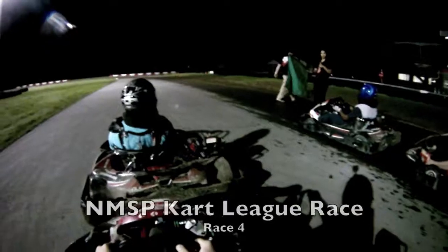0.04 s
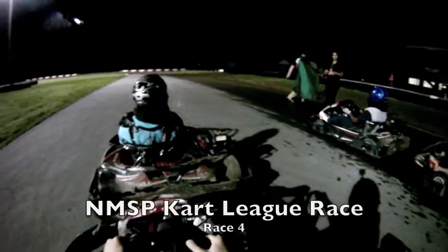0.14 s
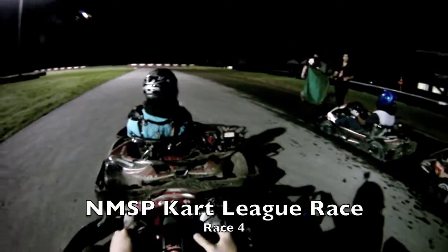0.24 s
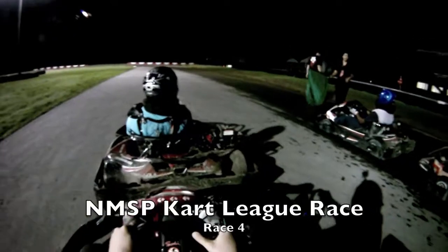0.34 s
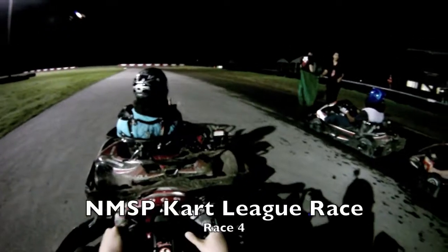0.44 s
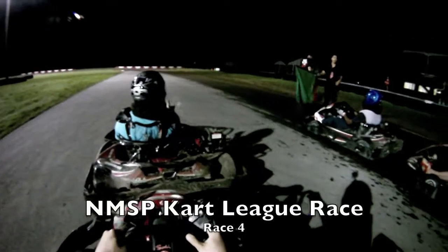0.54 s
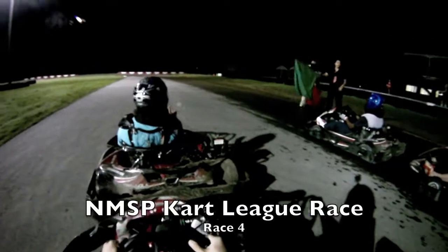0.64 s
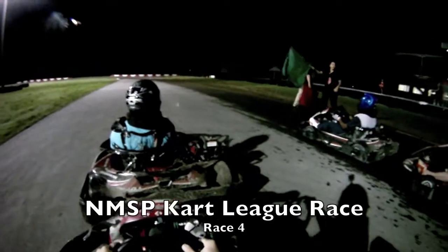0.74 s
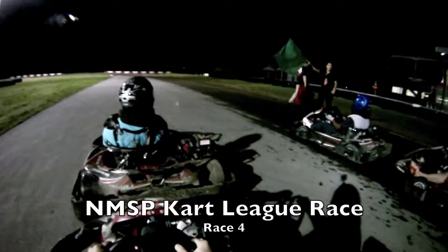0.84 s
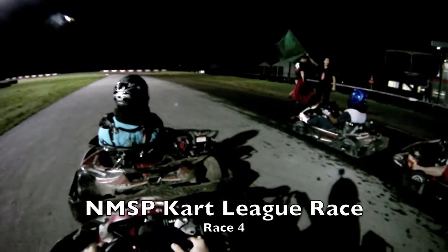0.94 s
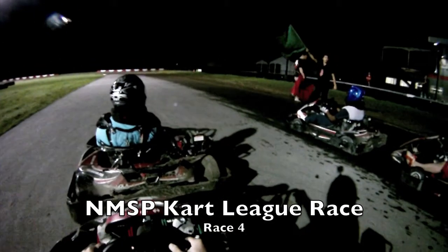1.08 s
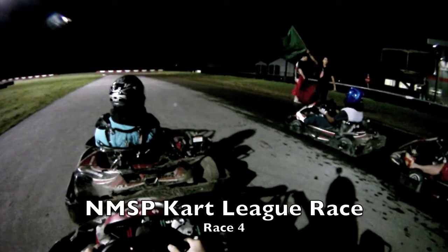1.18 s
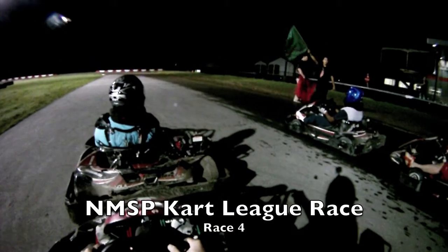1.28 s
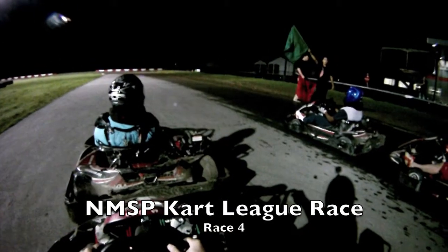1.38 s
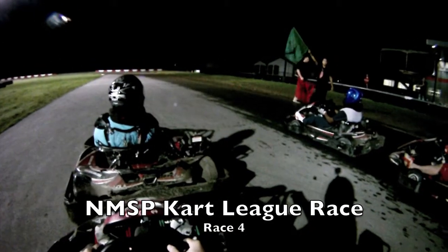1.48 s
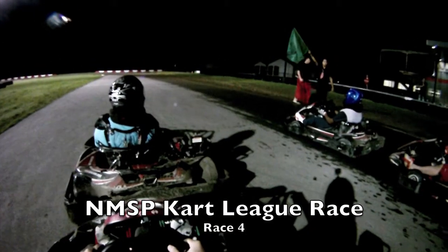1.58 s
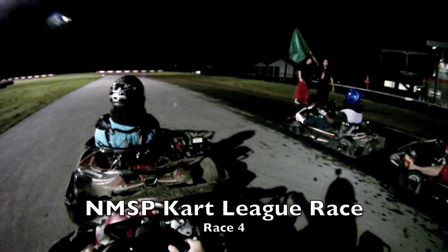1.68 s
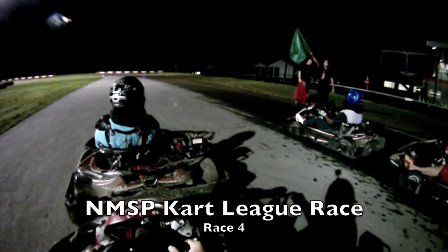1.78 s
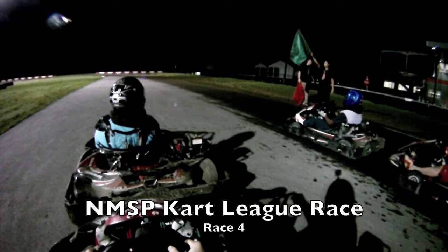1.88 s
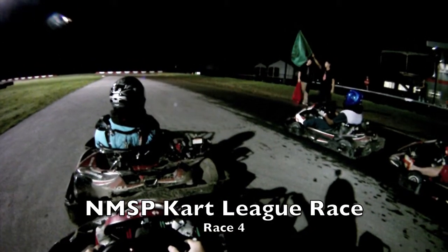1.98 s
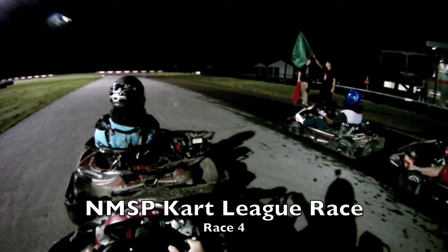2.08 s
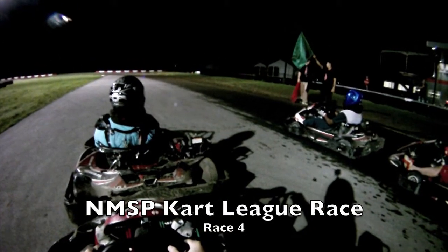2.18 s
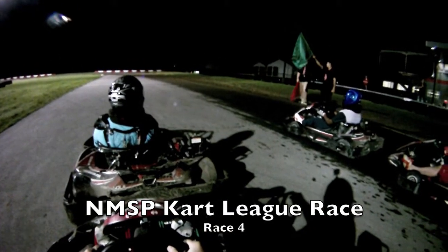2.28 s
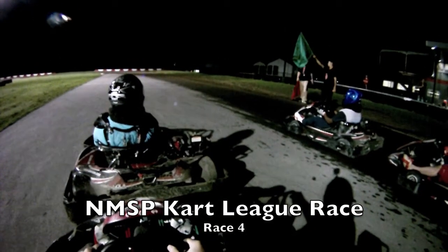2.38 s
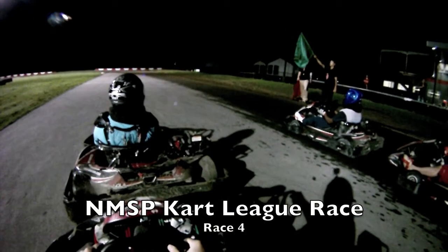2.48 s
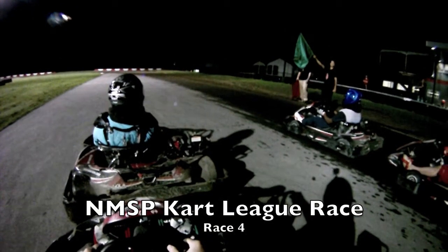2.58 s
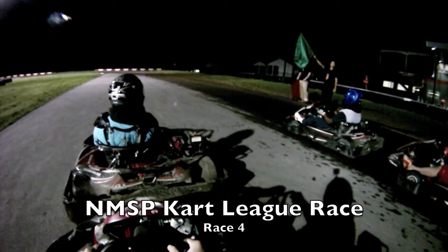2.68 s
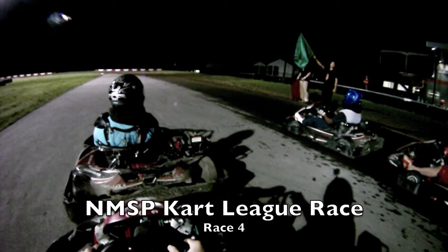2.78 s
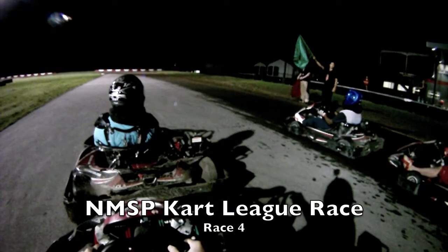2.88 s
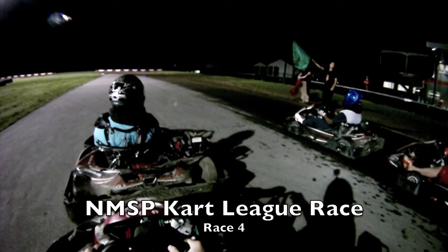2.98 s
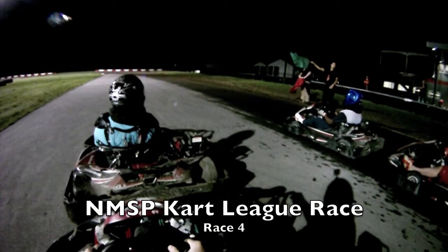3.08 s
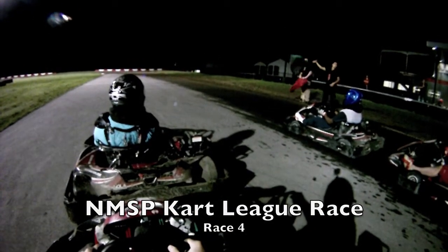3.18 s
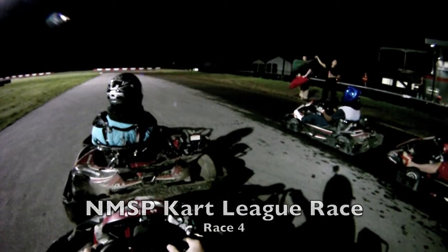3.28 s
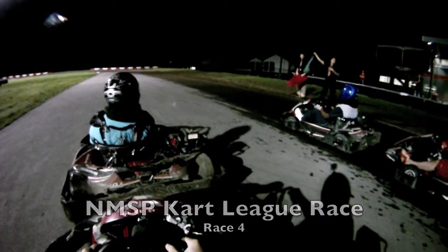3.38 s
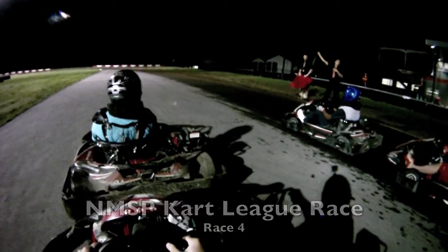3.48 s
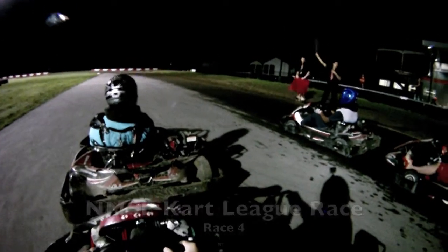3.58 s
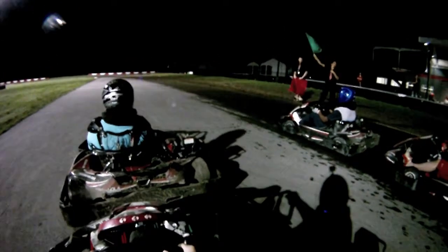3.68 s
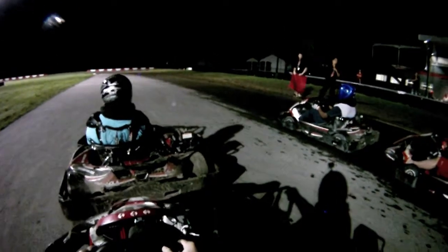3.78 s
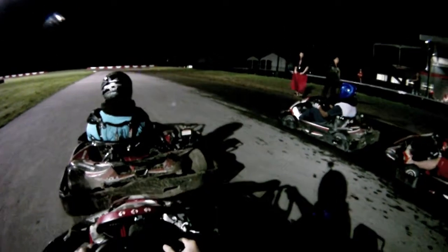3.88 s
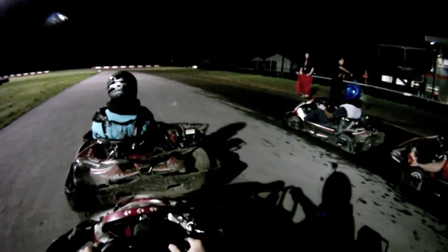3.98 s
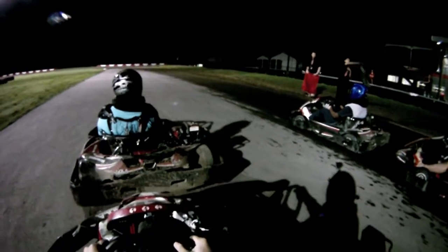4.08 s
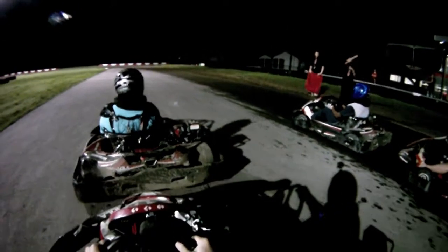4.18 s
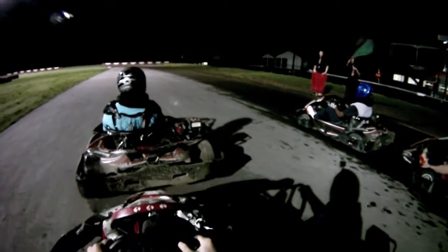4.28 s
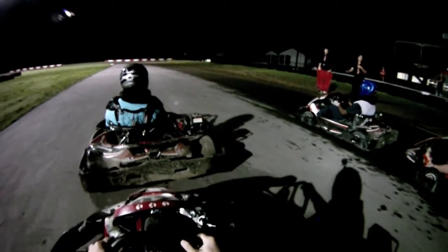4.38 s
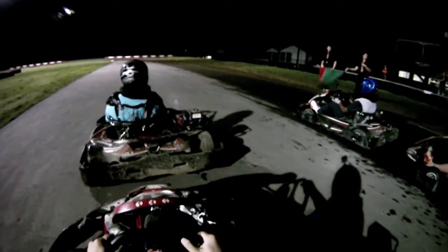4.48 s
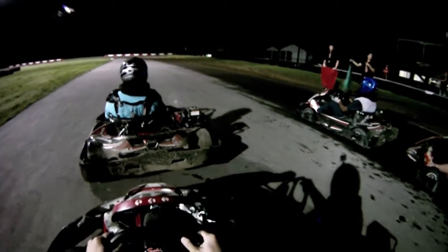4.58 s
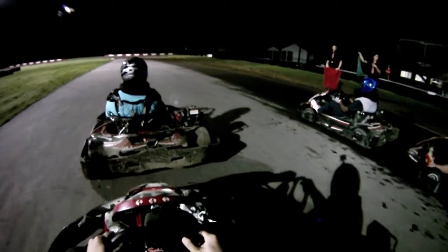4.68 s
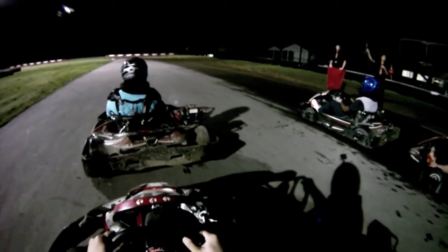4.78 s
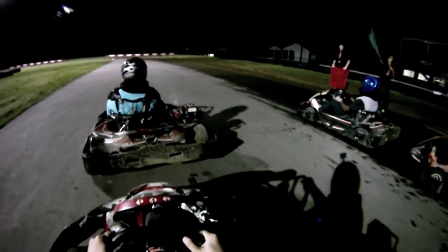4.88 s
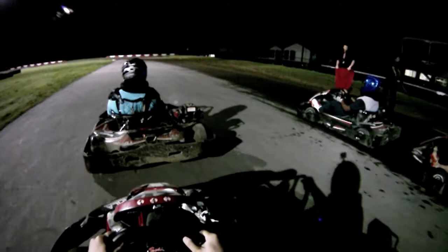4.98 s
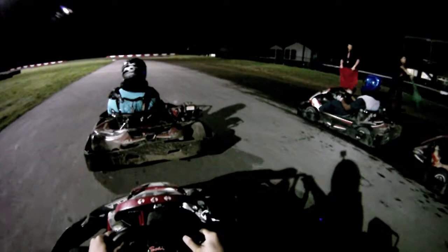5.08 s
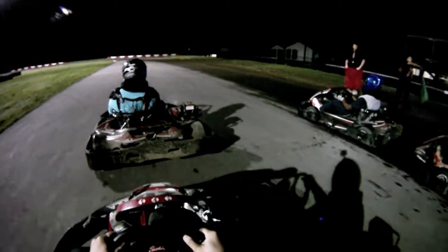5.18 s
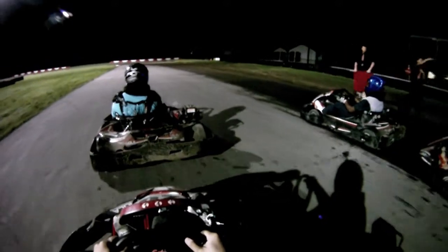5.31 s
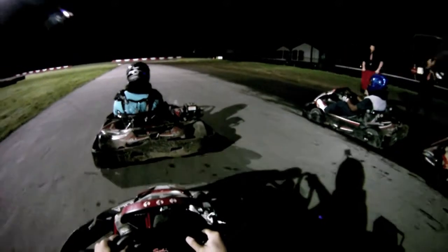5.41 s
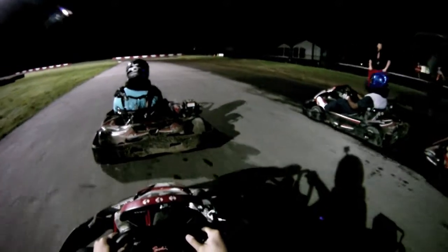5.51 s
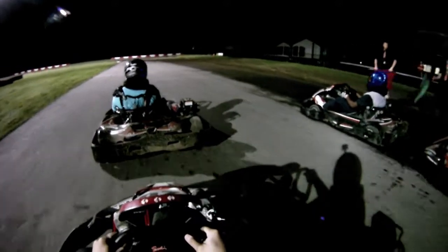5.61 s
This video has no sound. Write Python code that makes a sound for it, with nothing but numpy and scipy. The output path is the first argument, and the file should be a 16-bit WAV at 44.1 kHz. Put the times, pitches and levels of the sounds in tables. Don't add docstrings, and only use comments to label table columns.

```python
import sys
import numpy as np
from scipy import signal
from scipy.fft import rfft, irfft
from scipy.io import wavfile
from scipy.ndimage import uniform_filter1d

SR = 44100
rng = np.random.default_rng(int(sys.argv[2]) if len(sys.argv) > 2 else 0)


def magnitude_from_level(level_db):
    exponent = np.asarray(level_db, float) / 20
    return 10 ** exponent


def wrap_up_sound(samples):
    columns = np.atleast_2d(samples).T
    tamed = np.clip(columns, -1, 1)
    steps = np.round(tamed * 32767).astype(np.int16)
    wavfile.write(sys.argv[1], SR, steps)


N = 249165
T = np.arange(N) / SR

# (time [s], firing rate [1/s])
OWN_SPEED = [(0, 8.77), (1.8, 9.02), (2.4, 9.19), (2.9, 9.61), (3.3, 9.56), (3.45, 11.5), (3.7, 14.1),
             (3.8, 16.5), (3.9, 18.28), (4.0, 20.62), (4.2, 24.52), (4.35, 25.43), (4.5, 26.06),
             (4.7, 26.83), (4.9, 27.2), (5.15, 27.56), (5.65, 27.88)]
# (time [s], firing rate [1/s])
RIVAL_SPEED = [(3.36, 15.75), (3.5, 19.92), (3.7, 23.61), (3.9, 25.4), (4.2, 27.01), (4.6, 27.46),
               (5.0, 27.78), (5.65, 27.33)]
# (time [s], firing rate [1/s], level [dB])
FAR_BLIP = [
    (.1, 16, -80),
    (.3, 19.5, -60),
    (.45, 22.5, -58),
    (.6, 25.3, -56),
    (.8, 26.6, -55),
    (1.1, 27.2, -57),
    (1.35, 27, -75),
]
# (time [s], level [dB])
SHAKE = [(3.3, -33.5), (3.42, -18), (3.52, -24.5), (3.63, -11.5), (3.712, -13), (3.844, -35), (3.9, -15.5),
         (4.03, -13.5), (4.854, -18.5)]
# (time [s], level [dB])
RIVAL_THROTTLE = [(3.36, -38), (3.45, -34.5), (3.7, -33.5), (3.93, -31), (4.08, -37.5), (4.25, -32),
                  (4.55, -29.5), (4.85, -30), (5.65, -31)]
# (centre [Hz], width [Hz], gain [dB])
HOUSING = [(760, 19, 8), (1115, 293, 10.5), (1402, 45, -18), (1544, 73, 7), (2151, 273, 10.5),
           (2364, 256, 7), (2573, 217, 13), (3177, 43, 3.5), (3635, 440, 7), (4250, 810, -2.5),
           (5140, 350, 2)]
# (frequency [Hz], density [dB per Hz])
RATTLE = [(200, 2), (500, -7.5), (1000, -2), (2000, -1.5), (3000, -3.5), (4500, -5.5), (5500, -13),
          (6000, -19)]
# (frequency [Hz], density [dB per Hz])
BARK = [(200, -20.5), (500, -0.5), (1100, -1.5), (2000, -4), (3000, -6.5), (4500, -8), (5500, -11),
        (6000, -31)]
# (frequency [Hz], density [dB per Hz])
RUMBLE = [(30, -41), (70, 3), (130, 0.5), (250, -2.5), (400, -11), (700, -11), (1000, -39.5)]
# (frequency [Hz], gain [dB])
PIPE = [(70, -16), (110, -11), (165, -5), (200, -9), (245, -9), (278, 0), (305, -3), (335, -5), (360, 0),
        (395, -13), (450, -9), (540, -11), (700, -17)]
# (frequency [Hz], gain [dB])
FAR_PIPE = [(100, -14), (200, -6), (260, -8), (295, 0), (325, -5), (350, -9), (375, -5), (430, -20)]
# (time [s], peak level [dB], pitch [Hz], t60 [s])
KNOCKS = [
    (1.123, -40, 560, 0.036),
    (1.186, -40, 564, 0.049),
    (1.244, -36, 540, 0.021),
    (1.299, -42, 560, 0.031),
    (1.295, -35, 165, 0.041),
    (5.593, -20, 225, 0.16),
    (5.63, -24, 175, 0.12),
]
# (time [s], tick rate [1/s], level [dB])
CHATTER = [
    (1.15, 34, -75),
    (1.24, 49, -53),
    (1.5, 34, -58),
    (1.6, 86, -82),
]

OWN_FIRES_S, RIVAL_FIRES_S, CRANK_TOP_S = 3.19, 3.360, 5.0495
LOST_AT_S, LOST_S = 5.065, 1024 / 44100
IDLE_PER_S, FULL_PER_S = 9.0, 28.0

IDLE_SHAKE_DB, SHAKE_DB_PER_FIRING, IDLE_LOPE_DB, SETTLE_DB_PER_S = -43.5, 9.5, 0.5, 4.2
JOLT_S, JOLT_WIDTH_S, JOLT_DB = 0.51, 0.16, 6
MOUNT_HZ, MOUNT_WIDTH_HZ = 42, 16
LOCK_FROM_PER_S, LOCK_IN_PER_S, LOCK_SHARE, LOCK_HZ, RING_TOP_S = 9.6, 1.6, 0.94, 41, 3.655
CRANK_LEADS_PER_S, HANDOVER_PER_S, IDLE_SHARE, FULL_SHARE = 15.5, 1.8, 0.12, 0.985

IDLE_RATTLE_DB, IDLE_RUMBLE_DB, FAR_RATTLE_DB, FAR_RUMBLE_DB = -47, -53.5, -1, -2.5
RATTLE_DB, RATTLE_DB_PER_FIRING = 0.5, 0.4
RUMBLE_DB, SMOOTH_FROM_PER_S, SMOOTH_DB_PER_FIRING = -4.5, 24.3, 3
RING_DB, RING_DB_PER_FIRING, RING_FULL_PER_S = -3, 0.5, 22.3
CRACK_DB, CRACK_HZ, CRACK_WIDTH_HZ, CRACK_DULLS_DB_PER_FIRING = -10, 3530, 300, 0.85

PULLS_AWAY_S, AWAY_DB_PER_S = 4.62, 9
SILENCER_HZ, SILENCER_WIDTH_HZ = 1100, 95
RIVAL_DRONE_DB, DRONE_FOLLOWS, ROAR_DB, ROAR_FOLLOWS = -41.5, 1, -41, 0.86
OWN_DRONE_DB, OWN_DRONE_RISE_DB = -60.5, 24.5


def in_time(rows):
    s, *columns = np.transpose(rows)
    return [np.interp(T, s, column) for column in columns]


def on_log_hz(hz, rows):
    table = np.array(rows)
    return np.interp(np.log(hz), np.log(table[:, 0]), table[:, 1])


def power_sum(*dbs):
    return 10 * np.log10(sum(magnitude_from_level(db) ** 2 for db in dbs))


def rms_one(x, window_s=None):
    power = uniform_filter1d(x ** 2, int(window_s * SR)) if window_s else np.mean(x ** 2)
    return x / np.sqrt(power + 1e-12)


def shaped(x, spectrum, peaks=()):
    size = 2 ** 18
    hz = np.arange(size // 2 + 1) * SR / size + 1e-3
    db = on_log_hz(hz, spectrum)
    for mid_hz, width_hz, top_db in peaks:
        db = db + top_db * np.exp(-(2 * (hz - mid_hz) / width_hz) ** 2 / 2)
    cepstrum = irfft(np.log(magnitude_from_level(db)))
    cepstrum[1:size // 2] *= 2
    cepstrum[size // 2 + 1:] = 0
    return irfft(rfft(x, size) * np.exp(rfft(cepstrum)))[:N]


def resonance(x, hz, width_hz):
    r = np.exp(-np.pi * width_hz / SR)
    zeros = np.array([1, 0, -1]) * (1 - r * r) / 2
    poles = [1, -2 * r * np.cos(2 * np.pi * hz / SR), r * r]
    return signal.lfilter(zeros, poles, x + 1e-18)


def drift(rate_hz):
    knots = rng.standard_normal(400)
    return np.interp(T * rate_hz, np.arange(400), knots)


def cycles(per_s, zero_s):
    count = np.cumsum(per_s) / SR + per_s * LOST_S * (T > LOST_AT_S)
    return count - count[int(zero_s * SR)]


def firings(count, uneven_db, jitter_cycles):
    clicks = np.zeros(N)
    at = np.flatnonzero(np.diff(np.floor(count + jitter_cycles * drift(25))) > 0)
    clicks[at] = magnitude_from_level(uneven_db * rng.standard_normal(600)[:len(at)])
    return clicks


def puff(clicks, decay_s):
    return signal.lfilter([1], [1, -np.exp(-1 / (decay_s * SR))], clicks + 1e-18)


def orders(per_s, count, pipe, wobble_db, heard):
    out = np.zeros(N)
    for k in range(3, 24):
        db = on_log_hz(k * per_s[heard], pipe) + wobble_db * drift(6)[heard]
        out[heard] += magnitude_from_level(db) * np.sin(2 * np.pi * (k * count[heard] + rng.random()))
    return out


def shaking_db(per_s):
    jolt_db = JOLT_DB * np.exp(-((T - JOLT_S) / JOLT_WIDTH_S) ** 2)
    idle_db = IDLE_SHAKE_DB + SHAKE_DB_PER_FIRING * (per_s - IDLE_PER_S)
    idle_db = idle_db + IDLE_LOPE_DB * drift(6.3) + jolt_db
    run_db = in_time(SHAKE)[0] - SETTLE_DB_PER_S * np.maximum(T - SHAKE[-1][0], 0)
    return np.where(T < SHAKE[0][0], idle_db, run_db)


def mount(per_s, fired):
    kicks = fired + 0.005 * rng.standard_normal(N)
    ring = np.roll(kicks, int(0.0087 * SR))
    for _ in range(3):
        ring = resonance(ring, MOUNT_HZ, MOUNT_WIDTH_HZ)

    turn = 2 * np.pi * cycles(per_s, CRANK_TOP_S)
    crank = np.sqrt(2) * (np.cos(2 * turn) + magnitude_from_level(-29) * np.cos(turn))

    handed = np.clip((per_s - CRANK_LEADS_PER_S) / HANDOVER_PER_S, 0, 1)
    entered = np.clip((per_s - LOCK_FROM_PER_S) / LOCK_IN_PER_S, 0, 1)
    locked = LOCK_SHARE * entered * (1 - handed)
    steady = np.cos(2 * np.pi * LOCK_HZ * (T - RING_TOP_S))
    ring = np.sqrt(1 - locked) * rms_one(ring, 0.36) + np.sqrt(2 * locked) * steady

    crank_share = IDLE_SHARE * (1 - entered) + FULL_SHARE * handed
    mixed = np.sqrt(1 - crank_share) * ring + np.sqrt(crank_share) * crank
    return magnitude_from_level(shaking_db(per_s)) * mixed


def grid(per_s, fired):
    burst_db, clatter_db = neighbour_db()
    far_db = in_time(FAR_BLIP)[1]
    rattle_db = power_sum(IDLE_RATTLE_DB, far_db + FAR_RATTLE_DB, clatter_db)
    smoother_db = SMOOTH_DB_PER_FIRING * np.maximum(per_s - SMOOTH_FROM_PER_S, 0)
    rumble_db = power_sum(IDLE_RUMBLE_DB, far_db + FAR_RUMBLE_DB, burst_db + RUMBLE_DB - smoother_db)

    grain = magnitude_from_level(1.6 * drift(60) + 0.6 * drift(9)) * (1 + 0.7 * puff(fired, 0.009))
    rattle = rms_one(shaped(grain * rng.standard_normal(N), RATTLE, HOUSING), 0.295)
    rumble = rms_one(shaped(magnitude_from_level(1.1 * drift(22)) * rng.standard_normal(N), RUMBLE))
    intake_whistle = rms_one(resonance(rng.standard_normal(N), 799, 20))
    return magnitude_from_level(rattle_db) * rattle + magnitude_from_level(rumble_db) * rumble + magnitude_from_level(-66) * intake_whistle


def far_kart():
    per_s, level_db = in_time(FAR_BLIP)
    out = magnitude_from_level(level_db) * orders(per_s, cycles(per_s, 0), FAR_PIPE, 2.8, T < FAR_BLIP[-1][0])

    per_s, level_db = in_time(CHATTER)
    ticks = firings(cycles(per_s, 1.4), 1.4, 0.032)
    out += magnitude_from_level(level_db) * rms_one(resonance(ticks, 1570, 76))

    for s, peak_db, hz, t60_s in KNOCKS:
        age_s = np.maximum(T - s, 0)
        envelope = magnitude_from_level(peak_db - 60 * age_s / t60_s) * (1 - np.exp(-age_s / 0.00066))
        out += envelope * np.sin(2 * np.pi * hz * age_s)
    return out


def neighbour_db():
    burst_db = in_time(RIVAL_THROTTLE)[0] - 180 * np.maximum(RIVAL_FIRES_S - T, 0)
    slower_per_s = FULL_PER_S - in_time(RIVAL_SPEED)[0]
    return burst_db, burst_db + RATTLE_DB - RATTLE_DB_PER_FIRING * slower_per_s


def neighbour_bark(per_s, count, burst_db, away_db):
    fired = (T > RIVAL_FIRES_S - 0.01) * firings(count, 0.35, 0.0247)
    blow = puff(puff(fired, 0.001), 0.004)
    blow = blow + 0.6 * np.roll(blow, int(0.006 * SR)) + 0.3 * np.roll(blow, int(0.019 * SR))
    hiss = rms_one(shaped(blow * rng.standard_normal(N), BARK, HOUSING), 0.098)

    push = fired + 0.0014 * blow * rng.standard_normal(N)
    ring = resonance(resonance(push, SILENCER_HZ, SILENCER_WIDTH_HZ), SILENCER_HZ, 120)
    ring_fade_in = np.clip((T - RIVAL_FIRES_S) / 0.08 + 0.28, 0, 1)
    faint_db = RING_DB_PER_FIRING * np.maximum(RING_FULL_PER_S - per_s, 0) + away_db
    ring_db = burst_db + RING_DB - faint_db + 2.0

    edge = puff(fired, 0.009) * rng.standard_normal(N)
    crack = rms_one(resonance(edge, CRACK_HZ, CRACK_WIDTH_HZ), 0.134)
    crack_db = burst_db + CRACK_DB - CRACK_DULLS_DB_PER_FIRING * (per_s - per_s.min())

    return magnitude_from_level(burst_db + 1.57) * hiss + magnitude_from_level(ring_db) * rms_one(ring, 0.12) * ring_fade_in + magnitude_from_level(crack_db) * crack


def open_throttles(own_per_s):
    burst_db, clatter_db = neighbour_db()
    running = np.clip((T - RIVAL_FIRES_S + 0.023) / 0.039, 0, 1)
    per_s = in_time(RIVAL_SPEED)[0]
    count = cycles(per_s, RIVAL_FIRES_S)
    away_db = AWAY_DB_PER_S * np.maximum(T - PULLS_AWAY_S, 0)
    swing_db = clatter_db - clatter_db.max()

    rival_db = RIVAL_DRONE_DB + DRONE_FOLLOWS * swing_db - away_db
    rise = (own_per_s - IDLE_PER_S) / (FULL_PER_S - IDLE_PER_S)
    own_db = OWN_DRONE_DB + OWN_DRONE_RISE_DB * rise ** 2
    roar_db = ROAR_DB + ROAR_FOLLOWS * swing_db

    bark = neighbour_bark(per_s, count, burst_db, away_db)
    drone = magnitude_from_level(rival_db) * orders(per_s, count, FAR_PIPE, 3.5, running > 0)
    drone += magnitude_from_level(own_db) * orders(own_per_s, cycles(own_per_s, CRANK_TOP_S), PIPE, 4.06, running > 0)
    drone += magnitude_from_level(roar_db) * rms_one(shaped(rng.standard_normal(N), PIPE))
    return running * (bark + drone)


def scene():
    per_s = in_time(OWN_SPEED)[0]
    fired = firings(cycles(per_s, OWN_FIRES_S), 2.1, 0.011)
    mix = mount(per_s, fired) + grid(per_s, fired) + far_kart() + open_throttles(per_s)
    return mix[None]


def band_limit(x):
    return signal.sosfilt(signal.butter(12, 15710, fs=SR, output="sos"), x)


def record(dry):
    coarse = signal.resample_poly(dry, 40, 147, axis=1)
    held = signal.resample_poly(np.repeat(coarse, 4, axis=1), 147, 160, axis=1)
    held = np.pad(held, ((0, 0), (0, 20)))[:, :N]
    lowpass = signal.cheby2(10, 60, 16300, fs=SR, output="sos")
    return band_limit(signal.sosfilt(lowpass, held))


dry = scene()
out = record(dry)
wrap_up_sound(out)
```